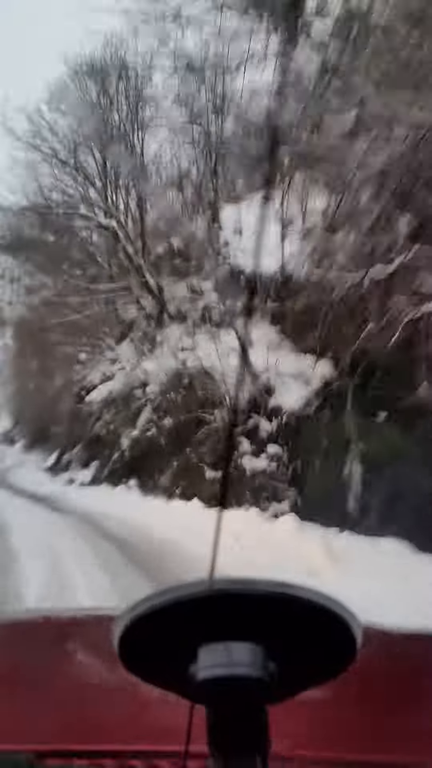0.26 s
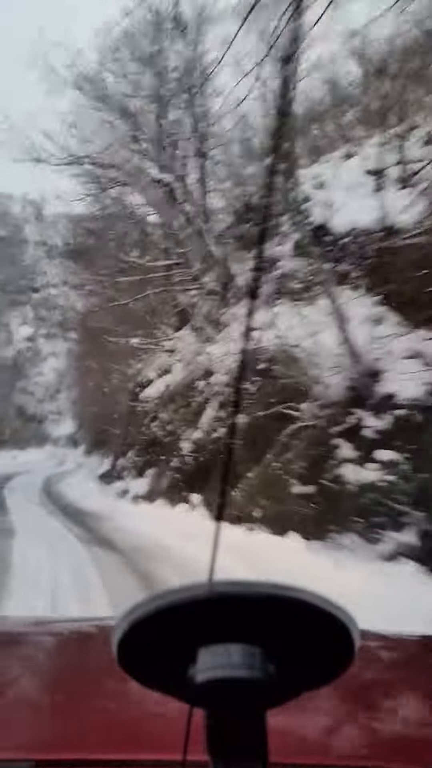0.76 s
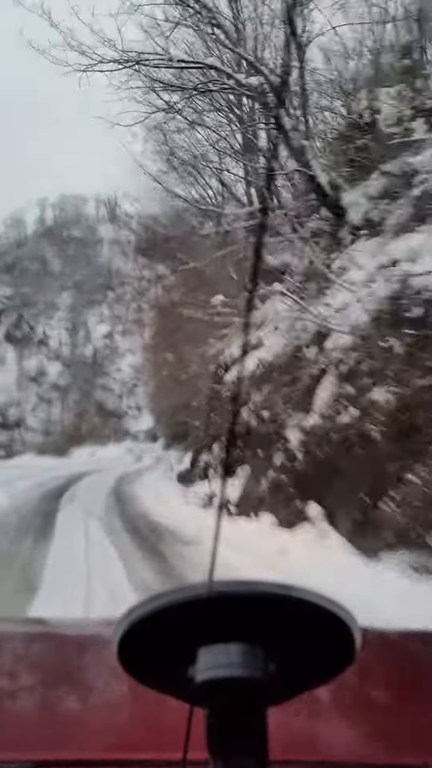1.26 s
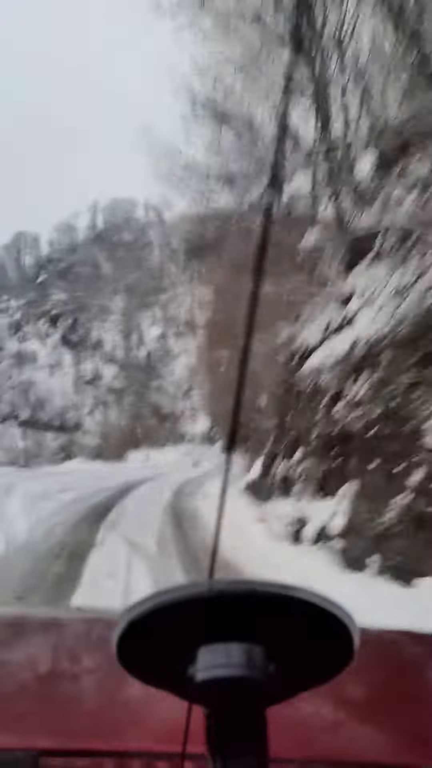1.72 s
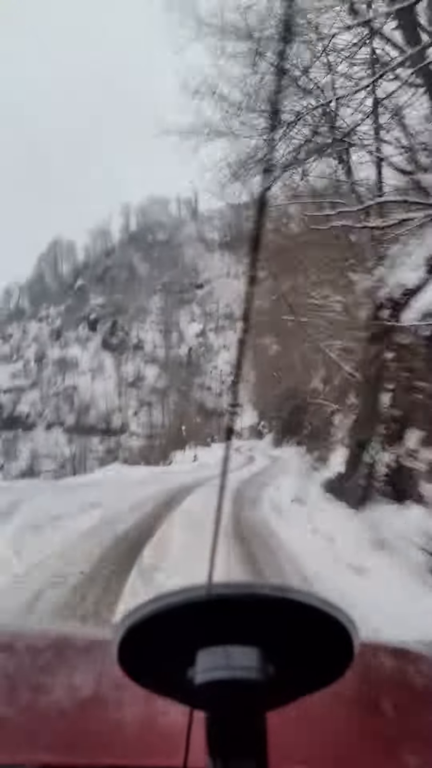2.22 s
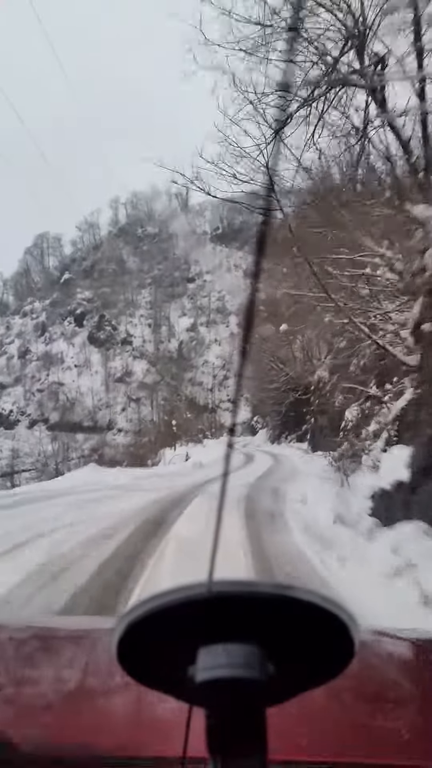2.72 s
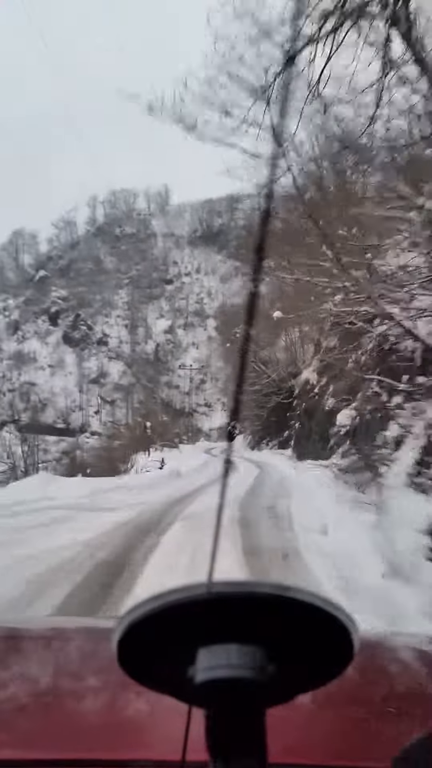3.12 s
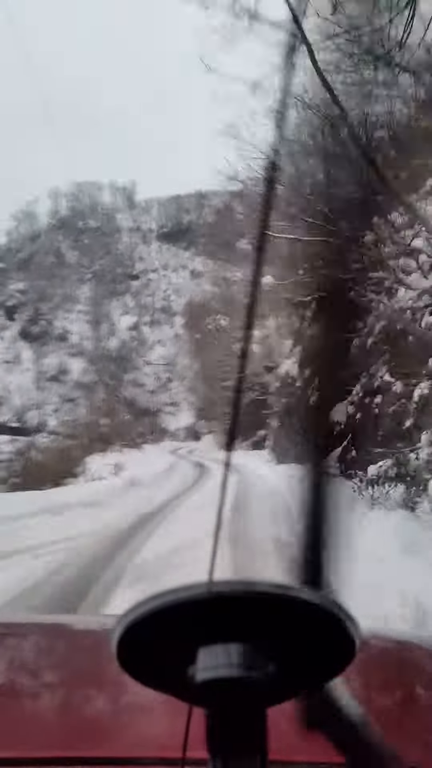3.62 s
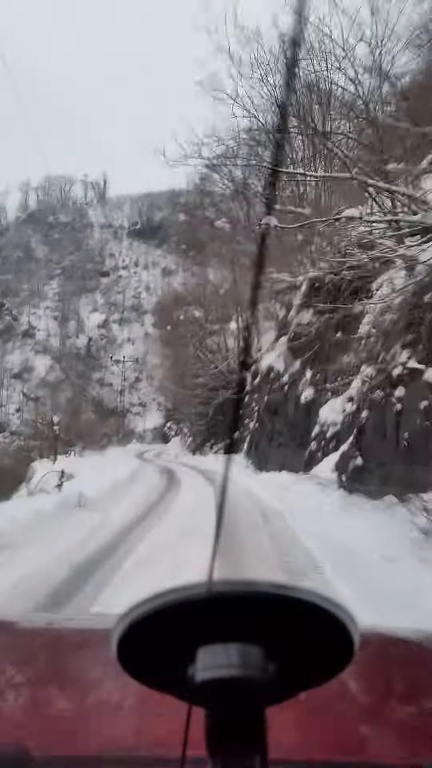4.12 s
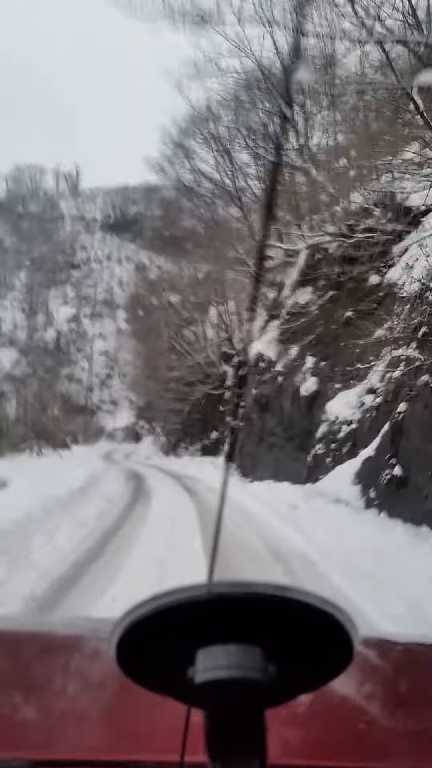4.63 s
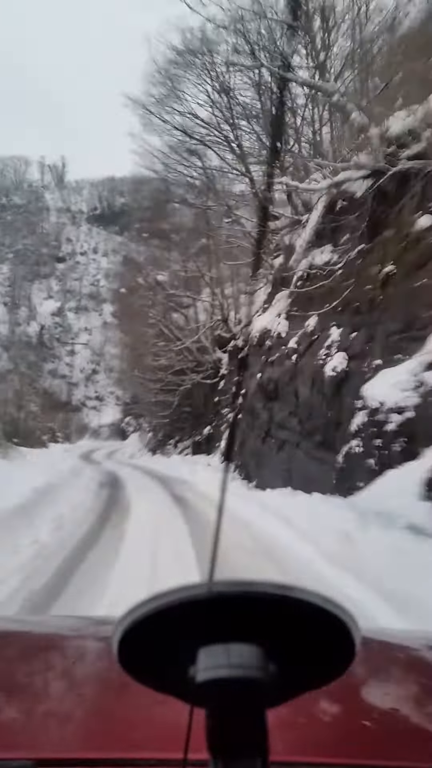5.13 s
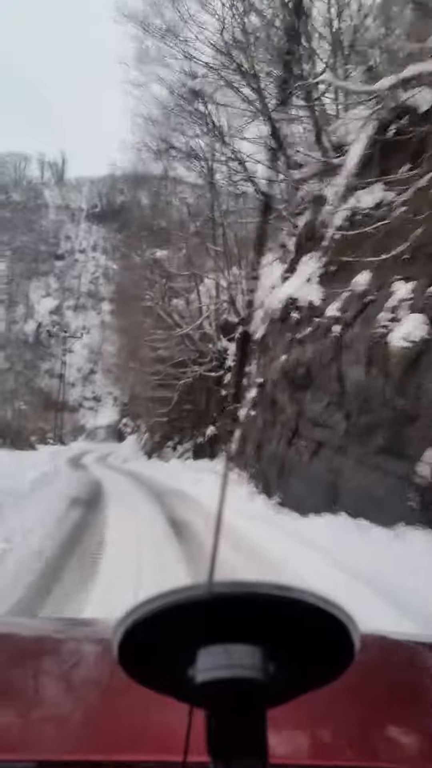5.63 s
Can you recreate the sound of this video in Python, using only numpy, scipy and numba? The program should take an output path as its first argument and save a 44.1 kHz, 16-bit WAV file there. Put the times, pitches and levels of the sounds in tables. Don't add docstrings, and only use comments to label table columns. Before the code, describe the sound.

After brief silence, a low droning engine fills the cab, with muffled bumps, faint trim ticks, wet spray and a short rubbery wiper scrape.

```python
import sys
import numpy as np
from scipy import signal
from scipy.fft import rfft, irfft
from scipy.io import wavfile
from scipy.ndimage import uniform_filter1d
from numba import njit

SR = 44100
rng = np.random.default_rng(int(sys.argv[2]) if len(sys.argv) > 2 else 0)


def materialize(psi):
    bounded = np.clip(np.atleast_2d(psi).T, -1, 1)
    quanta = np.round(bounded * 32767).astype(np.int16)
    wavfile.write(sys.argv[1], SR, quanta)


def amplitude_ratio(level_db):
    exponent = np.asarray(level_db, float) / 20
    return 10 ** exponent


N = 258426
TIME = np.arange(N) / SR

# start_s, firing_rate_hz, load_db
ENGINE_RUN = [(.25, 80, -1), (.5, 89.88, -13), (.7, 98.25, -9.5), (.85, 77.06, -5.5), (1.05, 74.24, -3),
              (1.25, 68.5, 5), (1.5, 74.57, -7.5), (1.75, 84, 2), (2.05, 82.87, -5), (2.25, 87.5, -10),
              (2.5, 82, -7), (2.73, 70.02, 1), (3.5, 72.07, -1), (4.2, 74.8, -1), (4.85, 76.07, -0.5),
              (5.05, 77.36, -6.5), (5.86, 78.85, -8.5)]


def unit(x):
    return x / np.sqrt(np.mean(x ** 2))


def along(table):
    s, *columns = np.transpose(table)
    return [np.interp(TIME, s, c) for c in columns]


def over(hz, table):
    f, v = np.transpose(table)
    return np.interp(np.log(np.maximum(hz, 1)), np.log(f), v)


def lift(hz, modes):
    return sum(db / (1 + (2 * (hz - f) / width) ** 2) for f, width, db in modes)


@njit
def svf(x, hz, width):
    y, b, l = np.empty(len(x)), 0., 0.
    for i in range(len(x)):
        g, k = np.tan(np.pi * hz[i] / SR), width / hz[i]
        v = (b + g * (x[i] - l)) / (1 + g * (g + k))
        b, l, y[i] = 2 * v - b, l + 2 * g * v, k * v
    return y


def walk(rate):
    k = int(SR / rate)
    steps = np.repeat(rng.standard_normal(N // k + 1), k)
    return 1.3 * uniform_filter1d(uniform_filter1d(steps, k), k)[:N]


def noise(colour, flicker_db, flicker_rate, shared_db, modes=()):
    # pitch_hz, likeness (0 to 1)
    likeness_curve = [(30, .998), (60, .994), (130, .98), (290, .8), (640, .45), (1400, .4), (3000, .4),
                      (15000, .3)]
    hz = np.arange(N // 2 + 1) * SR / N
    like = np.clip(over(hz, likeness_curve), 0, 1)
    mid, side = rfft(rng.standard_normal((2, N)))
    pair = np.sqrt(1 + like) * mid + np.sqrt(1 - like) * side * np.array([[1], [-1]])
    lowest_hz, highest_hz = colour[0][0], colour[-1][0]
    pair = pair * amplitude_ratio(over(hz, colour)) * (hz > lowest_hz / 2)
    pair = pair * amplitude_ratio(lift(hz, modes))
    out, shared = 0, shared_db * walk(flicker_rate * 2)
    for centre in lowest_hz * 2. ** np.arange(np.log2(highest_hz / lowest_hz) + 1):
        octaves_away = np.clip(np.log2(np.maximum(hz, 1) / centre), -1, 1)
        share = np.cos(np.pi / 2 * octaves_away) ** 2
        out = out + irfft(pair * share, N) * amplitude_ratio(flicker_db * walk(flicker_rate) + shared)
    return unit(out)


def tone(hz, db, wobble_db):
    phase = 2 * np.pi * (np.cumsum(hz) / SR + rng.random())
    return np.sqrt(2) * np.sin(phase) * amplitude_ratio(db + wobble_db * walk(25))


def within(start_s, end_s):
    return np.interp(TIME, [start_s - .002, start_s, end_s, end_s + .003], [0, 1, 1, 0])


def ring(hz, db, width_hz):
    return unit(svf(svf(rng.standard_normal(N), hz, width_hz), hz, width_hz)) * amplitude_ratio(db)


def engine():
    # multiple of firing rate, level_db
    weak_orders = [(.5, -13), (1.5, -13), (2.5, -23), (4, -32)]
    # multiple of firing rate, level_db
    whine_orders = [(9.5, -60), (13.5, -64)]
    # centre_hz, width_hz, lift_db
    cab_modes = [(72.34, 11, 9), (84, 13, 4), (141.1, 16, 6.5), (155.74, 13.06, 12)]
    # centre_hz, width_hz, lift_db
    dash_modes = [(748, 50, 11), (970, 65, 13), (1130, 80, 14)]
    hz, load_db = along(ENGINE_RUN)
    hz = hz * (1 + .002 * walk(20))
    boom = tone(hz, -21 + load_db + lift(hz, cab_modes), 1.1)
    octave = tone(2 * hz, -29.5 + 0.34 * load_db + lift(2 * hz, cab_modes), 1.8)
    weak = sum(tone(k * hz, -13.5 + db, 1.3) for k, db in weak_orders)
    whine = sum(tone(k * hz, db + lift(k * hz, dash_modes), 3.4) for k, db in whine_orders)
    return boom + octave + weak + whine


def road():
    # start_s, hold_s, fall_s, spray_lift_db
    slush_patches = [
        (0.357, .18, 0.38, 8),
        (0.458, .01, 0.15, 15),
        (1.494, 0.37, 0.28, 6),
        (1.572, .05, .12, 9.5),
        (2.063, 0.33, .25, 13),
        (2.182, .08, 0.23, 15.5),
        (3.558, 0.12, 0.21, 9.5),
        (4.296, 0.2, 0.11, 3.5),
        (5.096, 0.4, .15, 7.5),
        (5.72, 0.07, .1, 1),
    ]
    # pitch_hz, level_db per Hz
    thump_colour = [(15, -27), (24, 0), (38, 1.5), (60, -2.5), (100, -4), (125, -7), (170, -18.5),
                    (260, -30.5)]
    roar_colour = [(100, -31), (170, -3.5), (189, -9.5), (229, -6.5), (270, -7), (318, -9), (497, -27),
                   (660, -22), (903, -29.5), (1270, -29), (2450, -38.5), (2890, -40), (6000, -57.5),
                   (7800, -92.5), (13200, -120)]
    spray_colour = [(2060, -36), (3500, 1.5), (4050, -2.5), (4720, -6.5), (5670, -3), (7070, -6.5),
                    (8780, -4.5), (10500, -11), (13600, -43), (22000, -120)]
    sizzle_colour = [(5000, -17.5), (7500, -11.5), (8700, 1.5), (10500, -6), (13000, -20.5)]
    mist_colour = [(8500, -28.5), (10500, 2), (13000, -1), (15700, -2), (16500, -38.5)]
    # centre_hz, width_hz, lift_db
    panel_modes = [(334.6, 46, 3.5), (455, 36, 5.5), (835, 55, 3), (1270, 94, 3), (1647, 80, 6.5),
                   (2870, 400, 1.5)]
    rise_s = 0.065
    wet_db = np.max([np.interp(TIME, np.cumsum([s, rise_s, hold, fall]), [0, db, db, 0])
                     for s, hold, fall, db in slush_patches], axis=0)
    spin_hz = along(ENGINE_RUN)[0] - 73
    thump = noise(thump_colour, 2.3, 9, 0.37) * amplitude_ratio(-12.5)
    roar_db = -28.5 + 0.087 * wet_db + 0.14 * spin_hz + 1.1 * walk(3.3)
    roar = noise(roar_colour, 0.95, 7.4, 0.66, panel_modes) * amplitude_ratio(roar_db)
    spray = noise(spray_colour, 0.79, 24, 1.9) * amplitude_ratio(-64.5 + 0.84 * wet_db)
    sizzle = noise(sizzle_colour, 0.9, 16, 1.6) * amplitude_ratio(-73 + wet_db)
    mist = noise(mist_colour, .8, 10, 2.2) * amplitude_ratio(-72 + 0.098 * wet_db ** 2)
    return thump + bumps() + roar + spray + sizzle + mist


def bumps():
    # start_s, pitch_hz, level_db, length_s
    ruts = [(0.659, 47, -23, 0.3), (0.761, 108, -10.5, .14), (1.924, 52, -10, 0.12), (2.191, 35, -13, .14),
            (2.552, 44, -17, 0.34), (3.989, 44, -19.5, 0.23), (4.398, 92, -16.5, 0.096),
            (4.939, 40, -12.5, 0.16), (5.132, 90, -18, 0.18), (5.39, 50, -18.5, .25), (5.637, 95, -16, .2)]
    out = 0
    for s, hz, db, length in ruts:
        swell = np.sin(np.pi * np.clip((TIME - s) / length, 0, 1))
        out = out + tone(np.full(N, 1. * hz), db, 0.5) * swell
    return out


def wipers():
    # start_s, length_s, first_hz, last_hz, level_db
    squeaks = [(1.784, 0.033, 4300, 4050, -56), (2.785, 0.023, 2512, 2360, -47),
               (2.787, .016, 4920, 4183, -49), (2.806, 0.017, 4397, 4420, -47),
               (2.79, .022, 7050, 6620, -55), (2.793, 0.016, 3580, 3440, -46),
               (2.812, .015, 3737, 3740, -43.5), (2.8, 0.027, 5100, 5500, -50.5),
               (2.79, .04, 11370, 11200, -62), (2.819, .018, 9870, 10500, -53),
               (2.833, .02, 13900, 14400, -62), (2.86, 0.031, 13400, 12200, -56.5),
               (2.876, .016, 10400, 9570, -54), (2.893, 0.03, 10040, 10600, -52),
               (2.889, .025, 4900, 5200, -58.5), (2.91, 0.016, 12900, 13540, -60),
               (2.924, .055, 13700, 13840, -57.5), (2.983, 0.033, 13400, 13100, -58.5),
               (3.001, 0.059, 13960, 13980, -54.5), (3.043, 0.054, 14670, 15700, -61),
               (4.298, 0.024, 4190, 4245, -46.5),
               (3.679, 0.017, 8500, 9300, -52), (3.691, 0.044, 13900, 14700, -54),
                      (3.707, 0.026, 14770, 13750, -55), (3.727, .022, 11080, 10200, -52.5),
                      (3.736, .017, 8500, 8600, -56), (3.748, 0.015, 11400, 12900, -52.5),
                      (3.762, .03, 13700, 14350, -58.5), (3.486, 0.11, 4500, 4490, -58),
                      (3.504, .11, 8700, 8700, -55)]
    # start_s, length_s, scrape_db, blade_first_hz, blade_last_hz
    strokes = [
        (2.785, .06, -46.5, 8530, 9270),
        (3.442, 0.27, -41, 1056, 2290),
    ]
    # pitch_hz, level_db per Hz
    scrape_colour = [(1300, -21), (2300, -2.5), (3200, 0), (4300, -1), (5300, -8), (7300, -8),
                     (8700, -10.5), (10800, -14), (15700, -24.5)]
    out = sum(squeak(*q) for q in squeaks)
    # time_s, pitch_hz, level_db
    whistle = [(3.52, 4040, -57.5), (3.67, 3995, -52), (3.93, 3950, -63)]
    out = out + ring(*along(whistle), 240.) * within(3.52, 3.93) * amplitude_ratio(1.5 * walk(60))
    scrape = noise(scrape_colour, 1.2, 40, 1.2)
    peak, fade_db = .35, 24
    for s, length, db, first_hz, last_hz in strokes:
        share = np.clip((TIME - s) / length, 0, 1)
        from_peak = np.where(share < peak, 1 - share / peak, (share - peak) / (1 - peak))
        fall_db = -fade_db * from_peak ** 1.6
        rise = np.sin(np.pi / 2 * np.clip(share / .62, 0, 1)) ** 1.7
        hz = first_hz + (last_hz - first_hz) * rise
        blade_db = db + .35 * fall_db - 3 * np.log2(first_hz / 1000)
        blade = ring(hz, blade_db, 330.) * (1 - share) ** .5
        out = out + (scrape * amplitude_ratio(db + fall_db) + blade) * within(s, s + length)
    return out


def squeak(s, length, first_hz, last_hz, peak_db):
    hz, = along([(s, first_hz), (s + length, last_hz)])
    db = peak_db - 5 * np.clip(2 * (TIME - s) / length - 1, -1, 1) ** 2
    shaky = tone(hz + 65 * walk(400), db - 2.5, 2.5) * amplitude_ratio(2.2 * walk(200))
    return (shaky + ring(hz, db - 4, 450.)) * within(s, s + length)


def trim():
    # start_s, peak_db, left_minus_right_db, centre_hz
    tick_events = [(0.2715, -26, -10.5, 6000), (0.5242, -33.5, -6, 8300), (1.2118, -44, -9, 5250),
                   (1.481, -53, -2.5, 5640), (2.1222, -32.5, 2.5, 9120), (2.134, -39, -1, 4920),
                   (2.1402, -29.5, -17.5, 5000), (2.1583, -38.5, -2.5, 6250), (2.2537, -33, -9, 8750),
                   (2.2702, -36.5, -0.5, 8360), (2.502, -29, -5.5, 8800), (2.567, -41.5, -6.5, 8300),
                   (2.9116, -32, -9, 8590), (2.9825, -38, -6.5, 8300), (3.6718, -31.5, -4, 6280),
                   (3.9285, -32.5, -7.5, 5580), (4.0802, -50.5, -14, 4880), (4.2828, -39, -9.5, 7500),
                   (4.3798, -33, -6, 5360), (4.5417, -40, -11.5, 8620), (4.9607, -38, -3, 7570),
                   (5.0538, -36.5, -0.5, 5840), (5.6111, -29, -6, 8540), (5.682, -36.5, -4.5, 5420)]
    # start_s, peak_db, left_minus_right_db, centre_hz, length_ms
    knock_events = [(1.214, -33.5, 0.5, 1490, 6.7), (1.479, -34, -6, 1300, 11), (2.121, -33, 4, 1470, 14),
                    (2.139, -34, -19.5, 2830, 3.9), (2.502, -29, -7.5, 1390, 7.4),
                    (2.81, -30, -1, 1490, 10), (2.83, -21, -5, 483, 15), (3.926, -28.5, -2, 1540, 5.5),
                    (4.088, -37.5, -8, 1303, 11), (4.749, -26, -10.5, 930, 7), (.52, -33, -11, 5970, 20)]
    tick_ms = 2.4
    return hits([(*row, tick_ms) for row in tick_events], 1.35, .1) + hits(knock_events, .8, .8)


def hits(table, width, rise):
    out, t = np.zeros((2, N + 4096)), np.arange(4096) * 1000 / SR
    for (s, db, pan_db, hz, ms), grit in zip(table, rng.standard_normal((len(table), 3, 4096))):
        centre = np.full(4096, 1. * hz)
        swell = np.exp(-t / ms) * (1 - np.exp(-t / (rise * ms)))
        burst = (grit[0] + 0.7 * grit[1:]) * swell
        burst = burst + 6 * (np.arange(4096) == int(rise * ms * SR / 1000))
        burst = np.array([svf(svf(b, centre, width * hz), centre, width * hz) for b in burst])
        level = amplitude_ratio(db + np.array([[pan_db], [-pan_db]]) / 2)
        burst = burst / np.abs(burst).max(axis=1, keepdims=True) * level
        out[:, int(s * SR):int(s * SR) + 4096] += burst
    return out[:, :N]


def fan():
    # multiple of blade tone, level_db against it
    overtones = [(2, -21.5), (3, -23), (7.5, -39.5)]
    on_s, off_s, recover_s = 2.75, 3.6, 1.1
    drain = np.interp(TIME, [on_s, on_s + 0.13, off_s, off_s + recover_s], [0, 1, 1, 0])
    hz = 222.66 - 3.4 * drain + 0.612 * walk(6)
    db = -27.5 + 1.3 * walk(7)
    return tone(hz, db, 0.28) + sum(tone(k * hz, db + down_db, 2.6) for k, down_db in overtones)


def scene():
    # pitch_hz, left_minus_right_db
    balance_curve = [(60, -1.0), (110, -0.5), (200, -0.5), (380, -1.0), (700, -3.5), (1290, -4), (2380, -4),
                     (4400, -9), (8120, -10.5), (15000, 3.5)]
    left_lag_s = 0.00032
    hz = np.arange(N // 2 + 1) * SR / N
    side = np.array([[1], [-1]]) / 2
    shade = amplitude_ratio(over(hz, balance_curve) * side)
    lag = np.exp(-2j * np.pi * hz * left_lag_s * side)
    ports = (rfft(engine() + road() + fan()) * lag + rfft(wipers())) * shade
    return irfft(ports, N) + trim()


def band_limit(x):
    return signal.sosfilt(signal.butter(12, 15820, fs=SR, output="sos"), x)


def record(dry):
    # time_s, gain_db
    fade_in = [(.208, -31.5), (.222, -20.5), (.3, -10), (.45, -2), (.75, -0.5)]
    port_hz, port_width_hz, port_db = 8700., 640., -7
    port = np.array([svf(x, np.full(N, port_hz), port_width_hz) for x in dry])
    opening = amplitude_ratio(along(fade_in)[0]) * (TIME > fade_in[0][0])
    wet = (dry + amplitude_ratio(port_db) * port) * opening * amplitude_ratio(1.34)
    ceiling = .99
    return band_limit(ceiling * np.tanh(wet / ceiling))


dry = scene()
out = record(dry)
materialize(out)
```